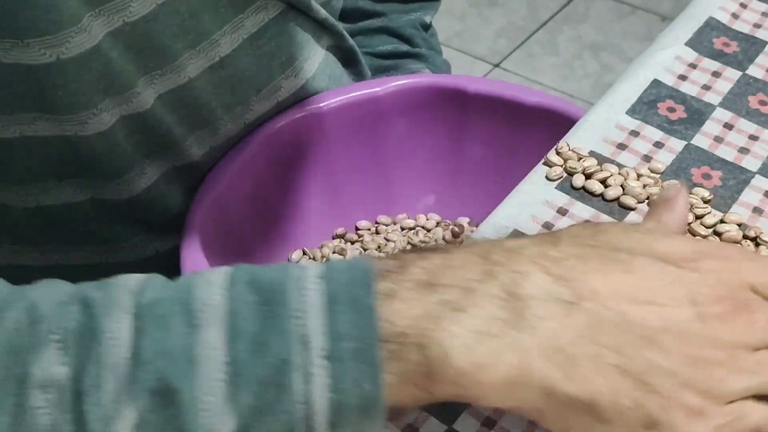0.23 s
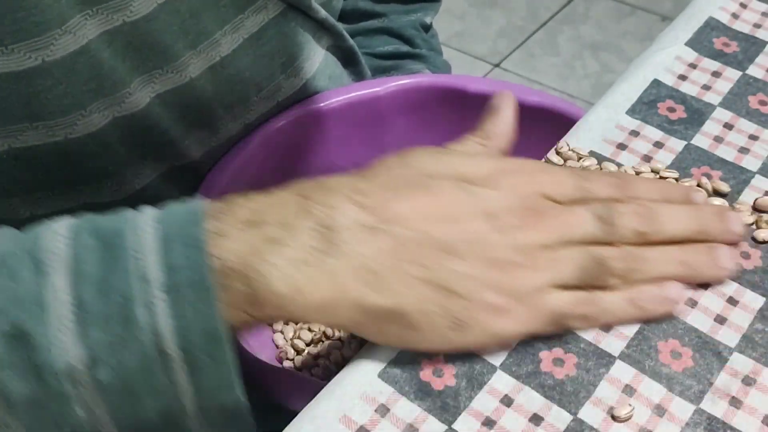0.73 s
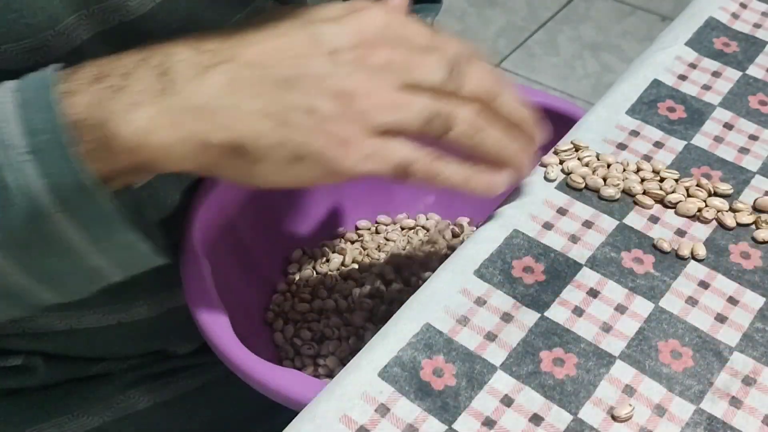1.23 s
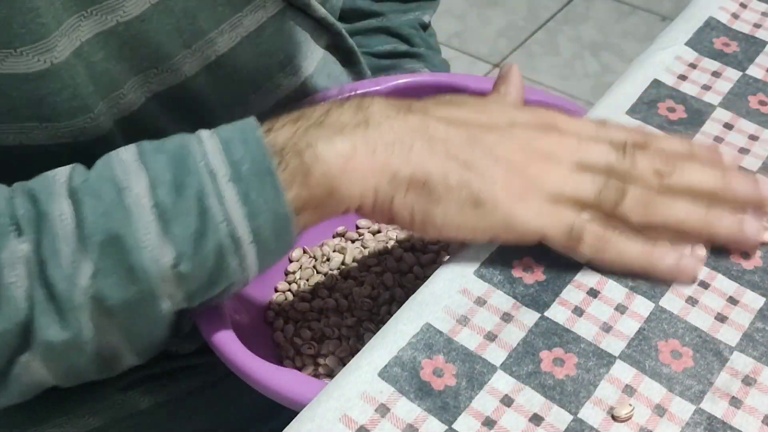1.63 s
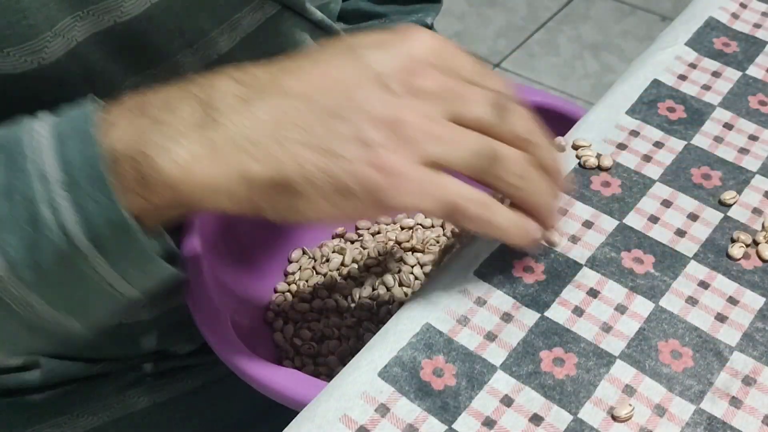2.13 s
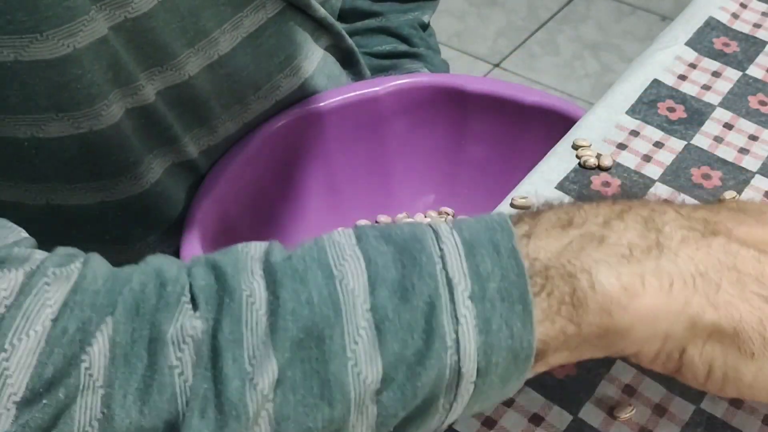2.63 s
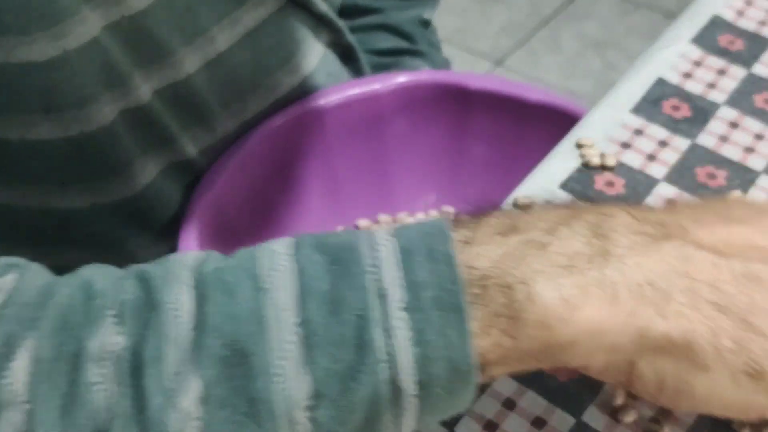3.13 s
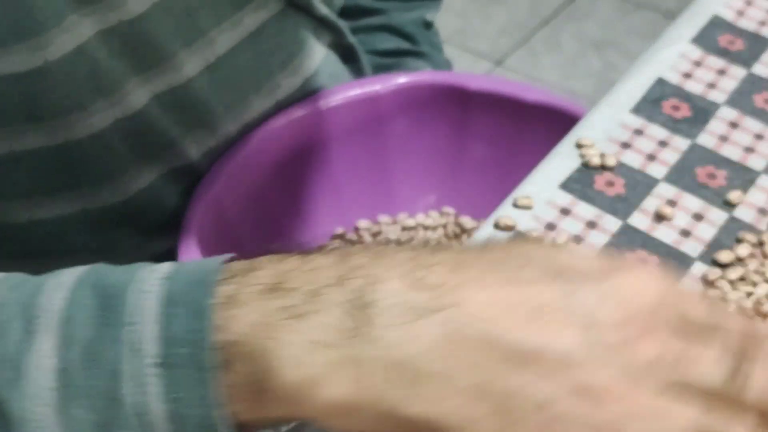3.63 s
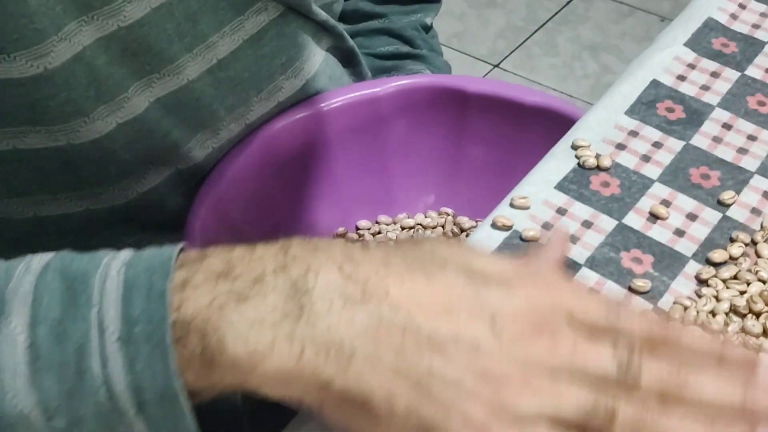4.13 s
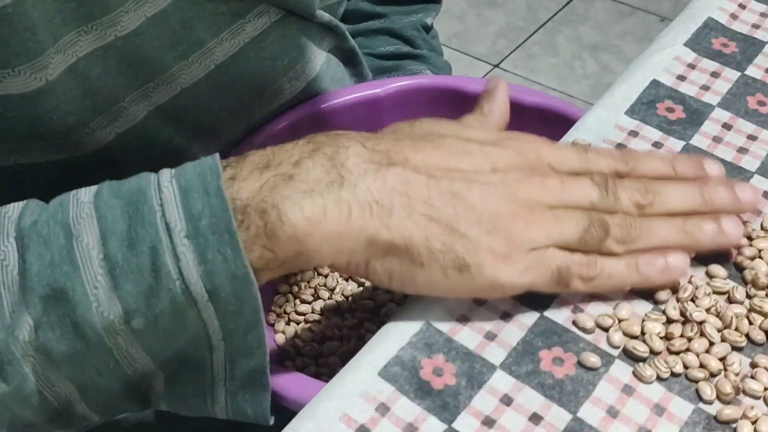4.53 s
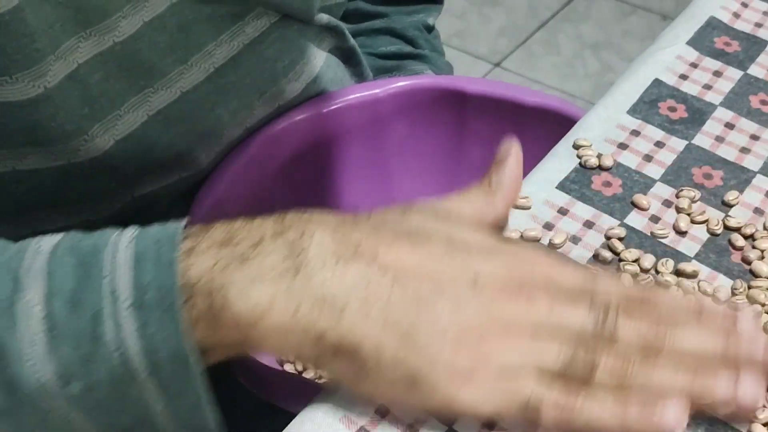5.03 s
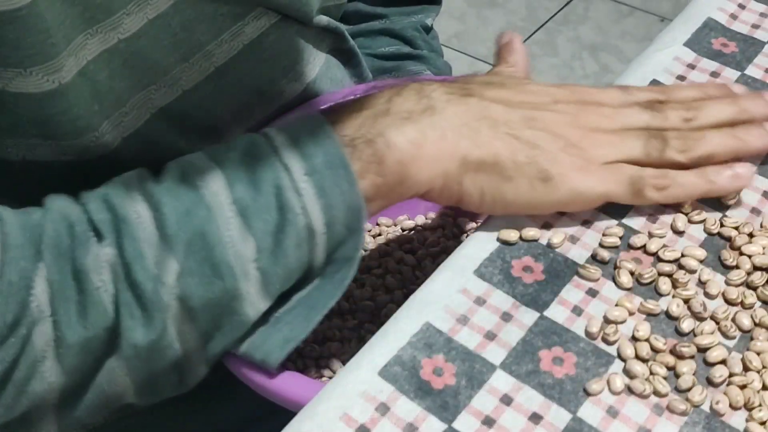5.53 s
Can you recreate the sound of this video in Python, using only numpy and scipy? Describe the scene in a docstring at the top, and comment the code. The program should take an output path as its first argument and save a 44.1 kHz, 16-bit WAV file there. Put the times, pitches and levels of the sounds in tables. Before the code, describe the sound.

Short bean-clicking sweeps on cloth come first, then a loud rattling pour into a plastic bowl with a low skin judder on the table edge. A smaller pour follows about a second later. The rest is brisk raking of beans, growing softer, with dull pats. Recorded close by in a lively room over a faint motor-like hum and rumble.

```python
"""Tiled room: low rumble, faint hiss and a wavering hum, perhaps a distant motor, run throughout (noise, sines).
At first a hand sweeps dried beans over a tablecloth: showers of slips on cloth and clicks of bean on bean.
From 1.05 s and 2.18 s two handfuls drop off the edge into a plastic bowl: knocks excite the wall's modes,
the first with a bright crack until beans cushion the wall; the palm judders low on the table edge.
From 2.7 s more beans are gathered, with clicks and soft pats of the hand."""
import sys
import numpy as np
from scipy import signal
from scipy.fft import rfft, irfft
from scipy.io import wavfile
from scipy.ndimage import uniform_filter1d

SR = 44100
rng = np.random.default_rng(int(sys.argv[2]) if len(sys.argv) > 2 else 0)


def master(y):
    """Save y as 16-bit WAV."""
    cut = np.clip(np.atleast_2d(y).T, -1, 1)
    pcm = np.round(cut * 32767)  # scale
    wavfile.write(sys.argv[1], SR, pcm.astype(np.int16))


N = 254898
TIME = np.arange(N) / SR


def undb(db):
    """Decibels to gain."""
    return 10 ** (np.asarray(db) / 20)


def unit(x):
    """Scale a response to energy 1 per channel."""
    return x / np.sqrt(np.sum(x ** 2, axis=-1, keepdims=True))


def on_log_axis(hz, points):
    """Interpolate (f/Hz, value) points over log frequency."""
    f_hz, value = np.transpose(points)
    return np.interp(np.log(np.maximum(hz, 1)), np.log(f_hz), value)


def convolve(x, response):
    """Play x through a response, keeping its length."""
    x = np.atleast_2d(x)
    return signal.oaconvolve(x, response, axes=-1)[:, :x.shape[-1]]


def colour(x, points):
    """Causal minimum-phase filter of unit energy with the given spectrum, built from its cepstrum."""
    size = 2048
    level_db = on_log_axis(np.fft.rfftfreq(size, 1 / SR), points)
    cepstrum = irfft(level_db * np.log(10) / 20)
    # fold the anticausal half onto the causal one
    cepstrum[1:size // 2] *= 2
    cepstrum[size // 2 + 1:] = 0
    response = unit(irfft(np.exp(rfft(cepstrum))))
    return convolve(x, response[None])


def resonate(x, hz, q):
    """One resonant peak, its pitch capped below Nyquist and its bandwidth at SR / 3."""
    hz = min(hz, SR * .42)
    b, a = signal.iirpeak(hz, max(q, hz / (SR / 3)), fs=SR)
    return signal.lfilter(b, a, x)


def burst(decay_s, likeness=0.):
    """A contact dying away in many crowded modes; likeness is the power shared by the two microphones."""
    t = TIME[:SR // 3]
    common, *separate = rng.standard_normal((3, len(t)))
    noise = np.sqrt(likeness) * common + np.sqrt(1 - likeness) * np.array(separate)
    return noise * np.exp(-t / decay_s)


def add(out, start_s, sound):
    """Mix a sound in at start_s."""
    start = max(int(start_s * SR), 0)
    out[:, start:start + sound.shape[1]] += sound[:, :N - start]


def swell(start_s, rise_s, hold_s, onset_db, sag_db_per_s, fade_db_per_s):
    """Level in dB of one movement: it sets in softly, gathers speed, sags a little and dies away."""
    held_s = TIME - start_s - rise_s
    rise_db = onset_db * np.clip(-held_s / rise_s, 0, 1)
    sag_db = sag_db_per_s * np.clip(held_s, 0, hold_s)
    fade_db = fade_db_per_s * np.maximum(held_s - hold_s, 0)
    return np.where(TIME < start_s, -200, np.maximum(rise_db - sag_db - fade_db, -200))


def shower(gain, per_s, response, count=8):
    """Random unequal impacts shared among several spots, each with its own response; power follows gain."""
    size_spread_db = 5
    chance = per_s / SR * np.ones(N)
    hit = rng.random(N) < chance
    size = hit * undb(size_spread_db * np.clip(rng.standard_normal(N), -2, 1))
    # even out the random impacts' power over a few hundredths of a second so that it follows gain
    power = uniform_filter1d(uniform_filter1d(size ** 2, size=700), size=700)
    size = gain * size / np.sqrt(power + chance / 10)
    spot = rng.integers(0, count, N)
    return sum(convolve(size * (spot == k), response()) for k in range(count))


def room(x, wet_db, build_s=0.00057):
    """Hard walls: a diffuse tail builds within about a millisecond and decays fastest in the top treble."""
    # room's ring: f/Hz, t60/s
    decay_times = [(200, 0.79), (1000, 0.39), (2500, 0.57), (7000, 0.33), (15000, 0.14)]
    t = TIME[:SR]
    f_hz, frame_s, tail = signal.stft(rng.standard_normal((2, SR)), SR, nperseg=256)
    t60_s = on_log_axis(f_hz, decay_times)[:, None]
    tail = tail * np.exp(-np.log(1000) * frame_s / t60_s)
    tail = signal.istft(tail, SR)[1][:, :SR]
    tail = tail * (1 - np.exp(-(t / build_s) ** 2))
    return x + undb(wet_db) * convolve(x, unit(tail))


def room_tone(mid_db=-63.0, wide_hz=900):
    """Steady rumble and faint hiss: shaped noise whose bass is nearly alike left and right."""
    # background spectrum: f/Hz, relative level/dB
    spectrum = [(15, -46), (25, -21), (39, -26), (92, -4.5), (123, -7), (212, -10.5), (285, -17.5),
                (317, -11), (394, -14.5), (840, -28.5), (1260, -26), (2110, -32.5), (2690, -36),
                (10100, -41), (16000, -40)]
    f_hz = np.fft.rfftfreq(N, 1 / SR)
    shape = unit(undb(on_log_axis(f_hz, spectrum))) * np.sqrt(len(f_hz))
    mid, side = rfft(rng.standard_normal((2, N))) * shape
    side = side * (f_hz + 80) / np.hypot(f_hz, wide_hz)
    return undb(mid_db) * irfft(np.array([mid + side, mid - side]), N)


def hum():
    """A low tone and its octave, wavering in pitch and level, perhaps a distant motor."""
    # hum track, levels before the left/right offset: t/s, f/Hz, fundamental level/dB, octave level/dB
    track = [(0, 40.2, -71, -66), (1.05, 40, -76, -64), (1.399, 36.7, -82, -66), (1.58, 38.6, -72, -50),
             (1.74, 49.8, -65, -98), (2.05, 51, -75, -83), (2.29, 47.9, -62, -56), (2.46, 46.3, -58, -53),
             (2.62, 43.8, -75, -58), (2.9, 49.6, -64, -58), (3.12, 53.8, -63.5, -75),
             (3.55, 54.55, -67.5, -75), (3.73, 45.45, -66, -55.5), (4.05, 51.1, -62, -65),
             (4.37, 52.24, -59, -74), (4.551, 48, -63.5, -60), (4.8, 41, -72, -62), (5.78, 37, -76, -75)]
    t_s, *columns = np.transpose(track)
    hz, low_db, octave_db = (np.interp(TIME, t_s, column) for column in columns)
    phase = 2 * np.pi * np.cumsum(hz) / SR
    tone = undb(low_db) * np.sin(phase) + undb(octave_db) * np.sin(2 * phase)
    return np.sqrt(2) * tone * undb(np.array([[1.2], [-1.2]]))


def palm():
    """Skin sticks and slips on the table edge: a brief low tone of unsteady pitch."""
    level_db, pitch_hz = -51, 145
    wander = np.interp(TIME, np.linspace(0, TIME[-1], 300), rng.standard_normal(300))
    phase = 2 * np.pi * np.cumsum(pitch_hz * (1 + 0.017 * wander)) / SR
    level_db = level_db + swell(1.12, rise_s=.06, hold_s=0.15, onset_db=-14, sag_db_per_s=56, fade_db_per_s=276)
    return np.sqrt(2) * undb(level_db) * np.sin(phase)


def hand():
    """Sum the pushes: clicking and cloth gains, power-weighted crispness and pan of the clicking beans."""
    # pushes of the hand: t/s, rise/s, hold/s, fade/(dB/s), relative click level/dB, relative cloth level/dB,
    # top-treble crispness at full speed/dB, left minus right/dB
    strokes = [ (-.02, 0.016, 0.06, 117, -50, -58.5, 4, -2),
               (0.356, 0.034, 0.068, 140, -58.5, -63.5, -2, -2), (.5, 0.079, .06, 42, -64, -71, -4, -1.5),
               (1.059, 0.21, .11, 166, -35, -68, 3.5, 1.7),
               (1.724, 0.0069, 0.019, 70, -64.5, -59.5, -3, -3),
               (1.89, 0.026, 0.036, 35, -89, -69.5, 8, -3), (2.171, 0.11, .168, 406, -41.5, -80, -3, 1.5),
               (2.717, 0.1, 0.069, 200, -43.5, -53.5, -7, -2.5),
               (2.865, 0.047, 0.14, 398, -46.5, -61, 2.5, -5), (3.107, 0.025, 0.054, 30, -60.5, -67, 5, -3),
               (3.224, 0.057, 0.047, 202, -44, -61, 4, -2), (3.584, 0.02, 0.025, 342, -48.5, -62, -4, -0.5),
               (3.661, 0.054, .22, 98, -78, -80, -6, -5), (4.166, 0.026, 0.018, 160, -68, -77, 4, -2),
               (4.306, 0.064, 0.066, 300, -55.5, -61, -8, 1), (4.442, .03, 0.076, 280, -57, -65, -12, -1.5),
               (4.681, 0.0064, 0.058, 194, -65.5, -67.5, 2, -1.5),
               (4.873, 0.0042, 0.0049, 220, -63.5, -65.5, -10, 1),
               (5.021, 0.052, .05, 222, -64.5, -66.5, -6, -1),
               (5.211, 0.022, 0.0096, 258, -56, -65, -14, -2)]
    onset_db, sag_db_per_s = -13, 19
    crisp_db_per_db = 1.1  # faster beans click more brightly
    click_power, cloth_power, crisp, pan = 0, 0, 0, 0
    for start_s, rise_s, hold_s, fade_db_per_s, click_db, cloth_db, crisp_db, pan_db in strokes:
        speed_db = swell(start_s, rise_s, hold_s, onset_db, sag_db_per_s, fade_db_per_s)
        power = undb(click_db + speed_db) ** 2
        click_power = click_power + power
        cloth_power = cloth_power + undb(cloth_db + speed_db) ** 2
        crisp = crisp + power * (crisp_db + crisp_db_per_db * speed_db)
        pan = pan + power * pan_db
    return np.sqrt(click_power), np.sqrt(cloth_power), crisp / click_power, pan / click_power


def table(drag):
    """Beans catch on the cloth in tiny slips; the hand lands with a soft, broadly resonant pat."""
    # slip spectrum: f/Hz, relative level/dB
    cloth = [(500, -9.5), (1500, -11), (2600, -10), (3800, -3), (5500, 0), (7000, -4.5), (10000, -5),
             (16000, -55)]
    # hand coming down: t/s, relative level/dB, f/Hz, Q
    pats = [(0.324, -59.5, 970, 2.4), (3.04, -62.5, 915, 2), (4.319, -61.5, 925, 1.8),
            (4.335, -65.5, 1310, 0.56), (4.694, -68, 2160, 0.52), (4.879, -61.5, 1710, 0.33)]

    def slip():
        return unit(colour(burst(0.0021), cloth))

    out = shower(drag * undb(0.5), per_s=1200, count=12, response=slip)
    for start_s, db, hz, q in pats:
        pat = burst(0.041, likeness=0.79)
        pat = resonate(resonate(pat, hz, q), hz, q)
        add(out, start_s, undb(db + 27.0) * unit(pat))
    return room(out, wet_db=-10)


def beans(gain, crisp_db, pan_db):
    """Hard skins click together in sub-millisecond contacts, more often the more beans are moving."""
    # bean contact spectrum: f/Hz, relative level/dB
    skin = [(500, -40), (2000, -23), (4000, -10.5), (5300, -8), (6600, 1), (8500, 0.5), (11000, 1.5),
            (14000, 1), (16000, 3)]
    # sharp single clicks: t/s, relative level/dB, f/Hz
    clicks = [(.051, -45.5, 12600), (1.052, -55, 10000), (1.349, -40, 9000), (1.582, -70, 9000),
              (2.168, -68, 11000), (2.180, -63, 12090), (2.410, -48, 7840), (2.442, -49, 12000),
              (2.722, -53.5, 9170), (2.873, -41, 5450), (2.963, -46, 11930), (3.123, -50.5, 11010),
              (3.233, -47, 13000), (3.285, -45, 12500), (3.600, -51.5, 8600), (4.373, -51.5, 5000),
              (4.416, -56, 8025), (4.693, -61, 8000), (4.78, -60, 10700), (4.880, -55.5, 9630),
              (4.925, -58, 10380), (5.056, -59, 8600), (5.253, -58, 9000)]
    rate_per_s, rate_at_db, crowding = 1300, -49, .38  # rate at that level, and its power law

    def contact():
        return unit(resonate(colour(burst(.0006), skin), rng.uniform(5800, 21600), q=1.53))

    per_s = rate_per_s * (gain / undb(rate_at_db)) ** crowding
    out = shower(gain, per_s, count=26, response=contact)
    out = out + (undb(crisp_db) - 1) * resonate(out, 15300, q=3.4)
    for start_s, db, hz in clicks:
        click = resonate(colour(burst(.0008), skin), hz, q=3.6)
        add(out, start_s, undb(db + 26) * unit(click))
    balance = undb(np.array([pan_db, -pan_db]) / 2)
    return room(out * balance, wet_db=-2)


def bowl_ring(knocks):
    """Every knock sets the plastic wall's modes ringing; Q follows from pitch and t60."""
    # wall modes: f/Hz, peak gain/dB, t60/s
    modes = [(384.3, 8.5, 0.2), (401, 0.5, 0.24), (423, -2, 0.25), (529.8, 17.5, 0.51), (549, 5, 0.48),
             (575, -24, 0.3), (620, -18, 1), (935, 8, 0.74), (1040, 3, 0.28), (1090, -16, 0.032),
             (1170, -5, 0.19), (1440, -43, 0.34), (1503, -1.5, 0.12), (1672, 7.5, 0.061), (1722, -13, 0.31),
             (1910, 8, 0.13), (2150, -17, .15), (2490, 9, 0.3)]
    return sum(undb(db) * resonate(knocks, hz, q=np.pi * hz * t60_s / np.log(1000)) for hz, db, t60_s in modes)


def bowl():
    """Falling beans drum on plastic: short knocks coloured by where they land, a crack, and the wall's ring."""
    # knock spectrum: f/Hz, relative level/dB
    shell = [(100, -5.5), (250, -7.5), (400, -3), (560, 2.5), (720, -10.5), (900, -10), (1080, 0.5),
             (1280, -6), (1650, -5), (2450, -6), (3200, -9.5), (4200, -13), (6000, -15.5), (15000, -26)]
    # handfuls landing: t/s, rise/s, hold/s, relative drumming level/dB, crack gain of the first beans/dB
    pours = [(1.05, 0.033, 0.47, -36, 4.5), (2.177, 0.13, 0.16, -39, -37)]
    # single beans on bare plastic: t/s, relative level/dB, f/Hz
    single_knocks = [(1.052, -38.5, 2800), (1.078, -33.5, 1690), (1.126, -32, 3280), (1.223, -33, 536),
                     (1.256, -29.5, 1460), (1.349, -20, 1450), (1.352, -27.5, 1230), (1.469, -30.5, 2090),
                     (1.471, -28, 2280), (1.502, -32.5, 2207), (1.535, -35, 537), (1.581, -39.5, 1918),
                     (1.586, -38, 550), (1.688, -39.5, 2240), (1.729, -44, 2200), (2.168, -50, 1760),
                     (2.288, -35, 650), (2.301, -27.5, 1890), (2.321, -32, 2170), (2.331, -27.5, 1600),
                     (2.365, -34, 1732), (2.410, -23.5, 1793), (2.442, -30.5, 600), (2.622, -45.5, 2440)]
    onset_db, sag_db_per_s, fade_db_per_s = -10, 6.5, 232
    bare_wall_s, cushion_s, cushioned_db = 0.086, 0.0083, -24.5  # the wall is soon covered, softening the crack

    def landing():
        knock = colour(burst(0.0022, likeness=0.44), shell)
        return unit(knock + resonate(knock, rng.uniform(1130, 3020), q=2.7))

    flow, hardness = 0, undb(cushioned_db)
    for start_s, rise_s, hold_s, db, crack_db in pours:
        flow = flow + undb(db + swell(start_s, rise_s, hold_s, onset_db, sag_db_per_s, fade_db_per_s))
        covered_s = np.maximum(TIME - start_s - bare_wall_s, 0)
        hardness = hardness + undb(crack_db) * (TIME >= start_s) * np.exp(-covered_s / cushion_s)
    knocks = shower(flow * undb(-6.0), per_s=270, response=landing, count=20)
    # short contacts on the bare wall add a bright crack
    crack = resonate(resonate(knocks, 3760, q=3.1), 3760, q=3.1)
    knocks = knocks + hardness * crack
    for start_s, db, hz in single_knocks:
        knock = resonate(colour(burst(0.0013, likeness=0.18), shell), hz, q=1.05)
        add(knocks, start_s, undb(db + 17.5) * unit(knock))
    return room(knocks, wet_db=-1) + bowl_ring(knocks)


def close_ports(x, wide_hz=650):
    """The two microphones are near each other, so long waves reach both alike."""
    mid, side = (x[0] + x[1]) / 2, (x[0] - x[1]) / 2
    b, a = signal.butter(1, wide_hz, "high", fs=SR)
    side = signal.lfilter(b, a, side)
    return np.array([mid + side, mid - side])


def scene():
    """Bowl, beans and table over the quiet room."""
    clicking, drag, crisp_db, pan_db = hand()
    impacts = bowl() + beans(clicking, crisp_db, pan_db) + table(drag)
    return close_ports(impacts) + palm() + hum() + room_tone()


def record(dry):
    """The phone cuts the deepest rumble and the top."""
    low_hz, top_hz = 30, 16000
    dry = signal.sosfilt(signal.butter(4, low_hz, "high", fs=SR, output="sos"), dry)
    return signal.sosfilt(signal.ellip(12, .2, 75, top_hz, fs=SR, output="sos"), dry)


dry = scene()
out = record(dry)
master(out)
```